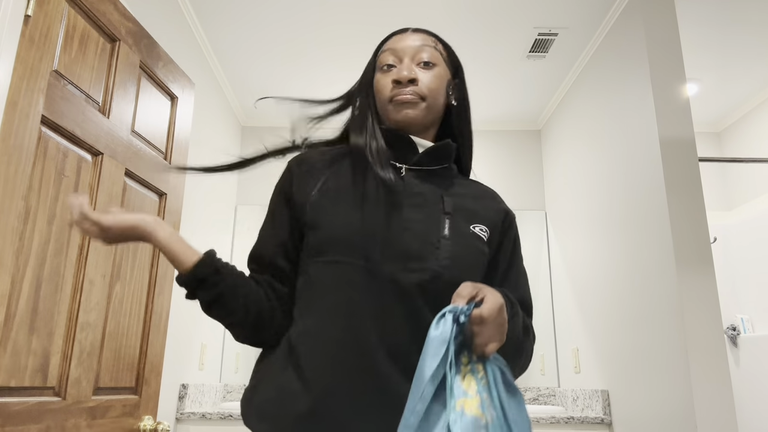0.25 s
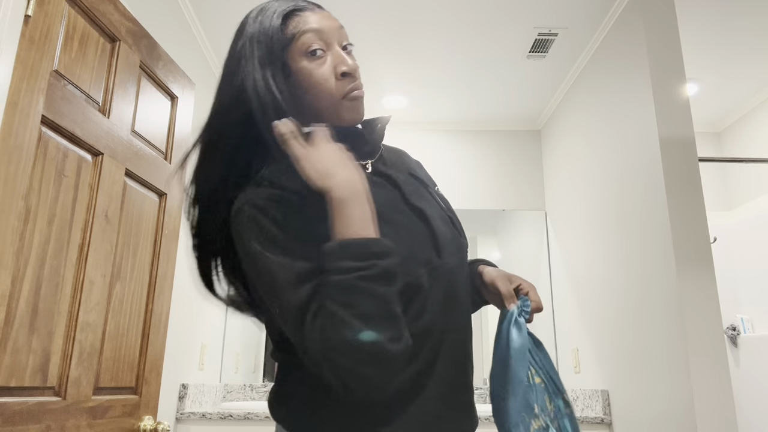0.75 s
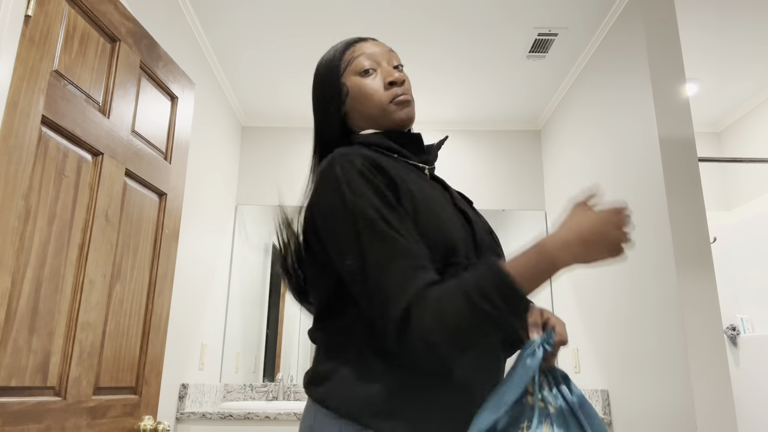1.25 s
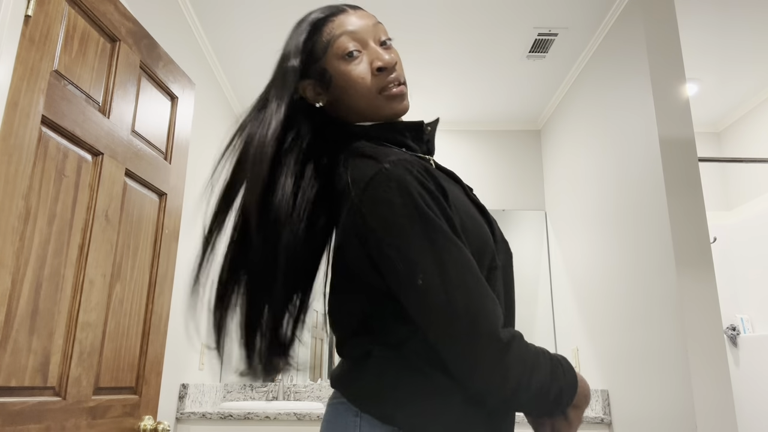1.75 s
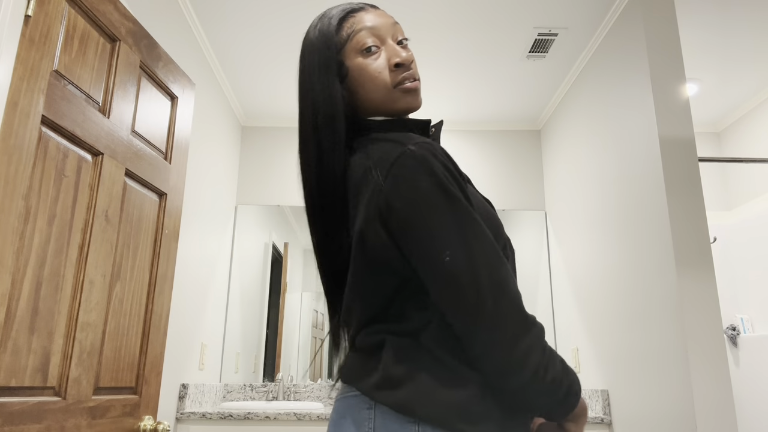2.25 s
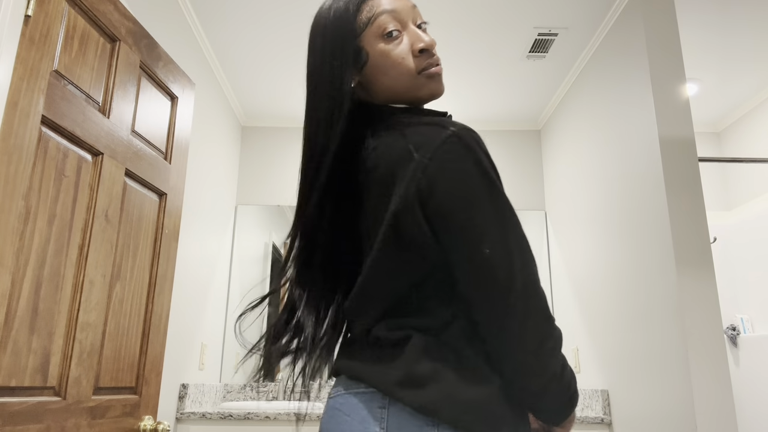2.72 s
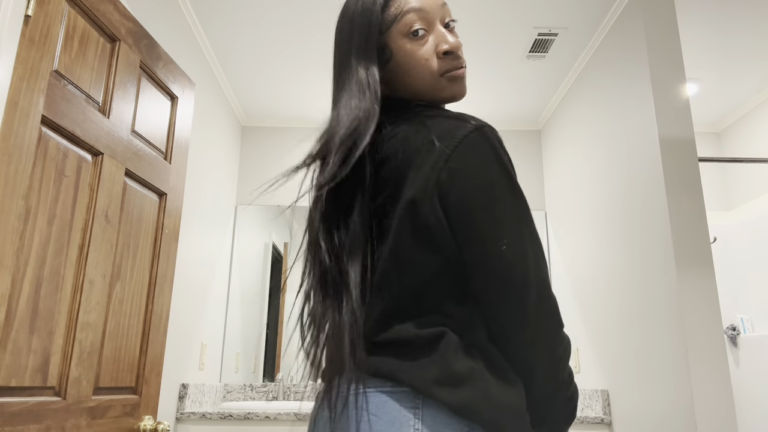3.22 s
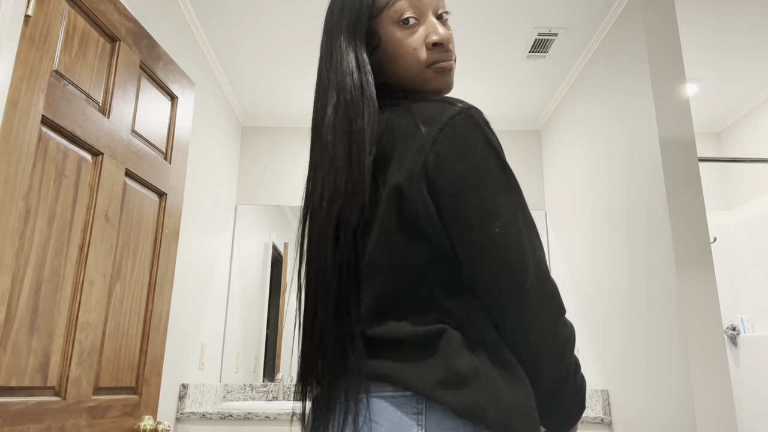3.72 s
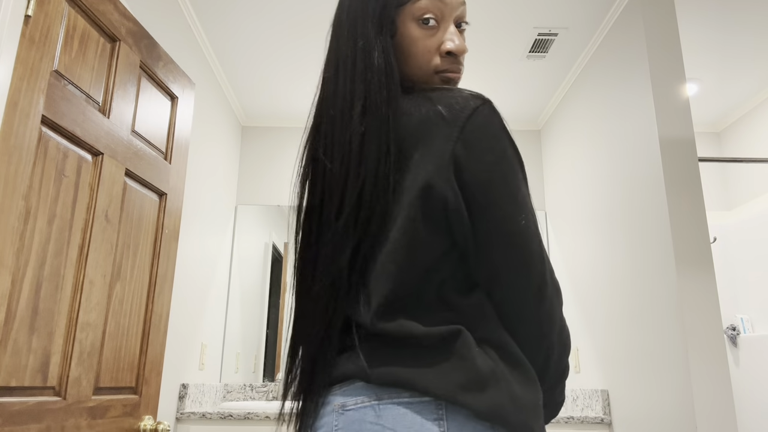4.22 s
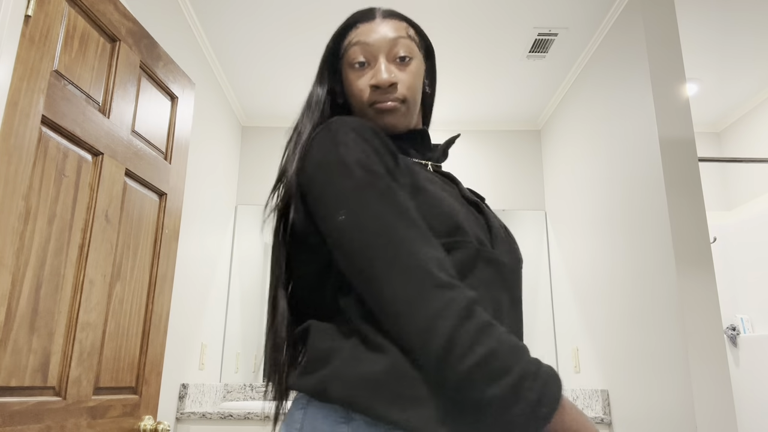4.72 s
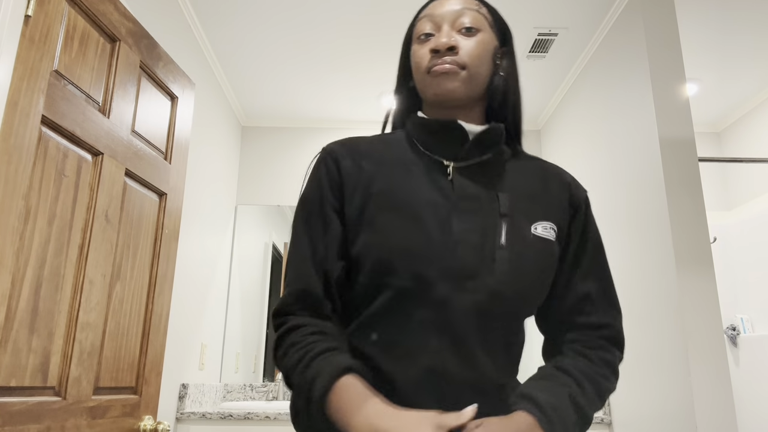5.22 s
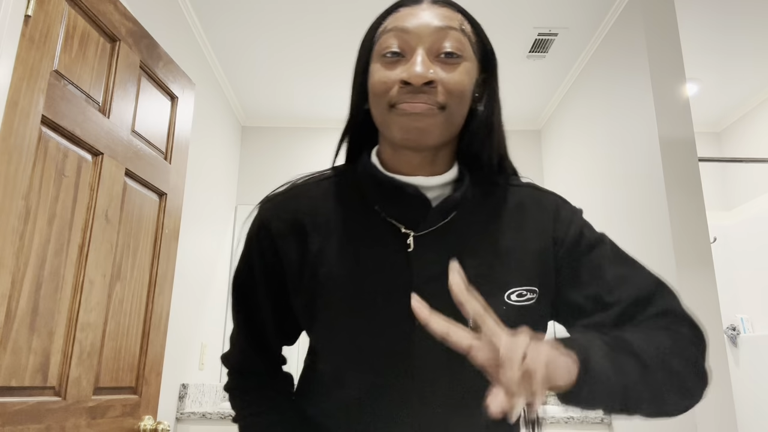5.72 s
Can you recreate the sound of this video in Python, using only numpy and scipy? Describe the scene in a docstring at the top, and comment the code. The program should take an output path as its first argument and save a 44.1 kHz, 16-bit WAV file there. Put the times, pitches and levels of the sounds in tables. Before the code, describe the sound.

A bathroom ventilation fan hums low and steadily while long hair and a fleece jacket swish faintly, with one sharper rustle near the end.

```python
"""A fan motor hums at twice the mains frequency, with weak wheel tones, under duct rumble and grille rush.
Over it, long hair and a fleece jacket swish now and then as someone turns about near the microphones.
The place is a small, hard-walled bathroom. Fan tones are fluttering cosines; air is shaped noise;
hair and sleeves are fibre slips plus hiss under movement swells; scrapes are grainy narrow noise bands;
jacket flaps are dull noise puffs. Hair, sleeves and scrapes also get a diffuse room answer."""
import sys
import numpy as np
from scipy import signal
from scipy.fft import rfft, irfft, next_fast_len
from scipy.io import wavfile
from scipy.ndimage import uniform_filter1d, map_coordinates

SR = 44100
rng = np.random.default_rng(int(sys.argv[2]) if len(sys.argv) > 2 else 0)


def dump(signal):
    """Clip the signal to [-1, 1] and save it as 16-bit WAV at the path in sys.argv[1]."""
    limited = np.clip(np.atleast_2d(signal).T, -1, 1)
    pcm = np.round(limited * 32767).astype(np.int16)
    wavfile.write(sys.argv[1], SR, pcm)


N = 262659

# lean_db is left minus right throughout; density_db is a relative noise spectrum per Hz
# motor and wheel tones: pitch_hz, level_db, left_right_phase_rad, flutter_share, lean_db
MOTOR_TONES = [(120, -26.2, 0, .049, -.3), (104, -51, 0, .3, 0), (240, -45, .31, .15, -4.5),
               (351, -57, .8, .9, 6), (360, -60, .8, .3, 3), (479.5, -64, .23, .3, 0),
               (600, -62, .16, .3, 0), (765, -62.5, 1.3, .9, -3), (1280, -73, .5, .9, 0)]
# very faint high whine: pitch_hz, level_db, left_right_phase_rad, flutter_share, lean_db
WHINE_TONES = [(6010, -91.5, 1.5, 1, 0), (6600, -93, 1.5, 1, 0), (9480, -93.5, 1.5, .3, 0),
               (9722, -93.5, 1.3, .3, 0)]
# slow course of the blade tone: time_s, level_db (before trim_db)
BLADE_COURSE = [(0, -53.5), (.6, -49.5), (1.3, -50), (2.101, -52), (3.1, -53), (3.6, -56.5), (4.401, -53),
                (4.9, -44.5), (5.3, -51), (5.95, -52.5)]
BLADE_HZ, BLADE_PHASE_RAD = 395.7, 1.34
# coming and going of a higher wheel tone: time_s, level_db (before trim_db)
OVERTONE_COURSE = [(0.0, -63), (0.08, -58), (2.5, -60), (2.55, -57), (3.15, -61), (3.17, -56), (5.95, -59)]
OVERTONE_HZ, OVERTONE_PHASE_RAD = 576, 1.7
# duct and room resonances: centre_hz, width_hz, relative_gain_db
DUCT_RESONANCES = [(61, 6.7, 1), (70, 14, 2), (113, 39, -3.5), (139.3, 10, 4.5), (165, 9, -10.5),
                   (229, 17, -4), (249.4, 12, -2), (265.4, 25, -7), (322.7, 23, -8.5), (354, 12, -6.5)]
# dip of the room where the microphones sit: centre_hz, width_hz, gain_db
ROOM_DIP = (202, 15, -5.5)
# air rushing through the grille: frequency_hz, density_db
GRILLE_SPECTRUM = [(250, -18), (420, 1), (520, -2), (600, 0.5), (780, -2), (900, -3.5), (970, -10.5),
                   (1300, -10.5), (1480, -15.5), (2100, -21.5), (2500, -25.5), (3000, -30), (4000, -32.5),
                   (5500, -38.5), (8000, -44), (8600, -44), (9900, -49.5), (11000, -70)]
# hiss of hair strands: frequency_hz, density_db
STRAND_SPECTRUM = [(1500, -9), (2100, -2), (3000, -6.5), (3600, -5), (4400, -4), (5300, -8.5), (6500, -7),
                   (8200, -8), (9700, -12.5), (10500, -27), (13000, -18), (14200, -40.5)]
# hair swinging over the fleece: peak_s, level_db, rise_s, fall_s
HAIR_SWINGS = [(0.06, -67, 0.093, 0.067), (0.395, -59, .025, 0.024), (0.445, -54, 0.079, 0.085),
               (0.69, -57.5, 0.038, 0.054), (0.775, -54.5, 0.051, 0.039), (0.868, -50, 0.069, 0.058),
               (1.402, -55.5, 0.025, 0.029), (1.595, -54.5, 0.03, 0.073), (1.69, -56, .03, 0.075),
               (1.85, -53, 0.02, 0.025), (1.91, -57.5, 0.028, 0.047), (2.09, -64.5, 0.022, 0.079),
               (2.24, -61, 0.051, 0.047), (3.05, -67, 0.056, 0.027), (3.18, -65, 0.042, 0.072),
               (3.485, -52.5, 0.063, 0.098), (3.565, -54.5, 0.062, 0.063), (4.06, -62, 0.052, 0.098),
               (4.43, -65, 0.067, 0.047), (4.62, -61.5, 0.042, .06), (4.78, -54, 0.15, 0.079),
               (5.344, -40.8, 0.017, 0.034), (5.285, -55, 0.045, 0.035), (5.4, -51.5, 0.053, 0.16),
               (5.562, -48, 0.017, 0.053), (5.9, -59, 0.088, 0.087)]
# soft creep of the hair while the body turns: peak_s, level_db, rise_s, fall_s
BODY_TURNS = [(1.0, -64, .3, 0.12), (1.65, -65.5, 0.61, 0.44), (4.95, -67.5, 0.24, 0.65),
              (5.65, -65.5, .3, 0.33)]
SWELL_EXPONENT = 1.34  # 1 = pointed, 2 = bell
# strands that catch and let go: rate, boost ceiling before levelling, decay time
SNAGS_PER_S, SNAG_DB, SNAG_S = 86, 2.5, 0.0033
# dull rub of the fleece: frequency_hz, density_db
FLEECE_SPECTRUM = [(200, -44.5), (500, 10.5), (900, 11), (1500, 2), (2100, 2.5), (3000, -3), (5000, -27),
                   (9500, -31), (12000, -61.5)]
# sleeves brushing the body: peak_s, level_db, length_s (Gaussian sigma), rasp_hz, rasp_db (re rub)
SLEEVE_BRUSHES = [(0.487, -53, 0.022, 3960, -15), (0.586, -54.5, 0.02, 3800, -11),
                  (0.75, -65.5, 0.016, 3700, 2), (0.877, -57.5, 0.017, 3430, -5),
                  (1.41, -49, 0.017, 3650, -8), (1.617, -54, 0.028, 7800, -3.5),
                  (1.852, -49, 0.025, 4200, -11.5), (3.178, -65, 0.04, 3900, -3),
                  (3.492, -57.5, 0.028, 3600, -1), (3.56, -57, 0.033, 3380, -4),
                  (4.768, -65, 0.058, 3820, -2), (5.356, -45.5, .027, 6000, -1),
                  (5.425, -53, 0.13, 6000, -17), (5.582, -45.5, 0.025, 6000, -18),
                  (5.881, -51, 0.055, 3980, -16)]
# fold or seam dragging over the fleece: peak_s, level_db, length_s (rise to peak), pitch_hz
SEAM_SCRAPES = [(0.485, -62, .012, 2400), (0.595, -63, .008, 2300), (0.754, -60, .006, 3650),
                (0.872, -57, .014, 2400), (0.922, -56, .004, 4000), (1.408, -60, .008, 2900),
                (1.61, -61, .012, 2050), (1.851, -58, .007, 4500), (3.18, -62, .035, 1900),
                (3.47, -61, .012, 4400), (3.575, -59, .03, 4700), (5.345, -51, .018, 2350),
                (5.35, -53, .014, 4400), (5.342, -50, .011, 6250), (5.42, -57, .035, 4700),
                (5.57, -60, .012, 1900)]
# rasp width, unevenness of the weave and its rate
SCRAPE_OCTAVES, SCRAPE_GRAIN_DB, SCRAPE_GRAINS_PER_S = .16, 2.5, 220
# loose jacket flapping now and then in dull puffs: peak_s, level_db, rise_s, fall_s
JACKET_FLAPS = [(1.44, -51, .06, .06), (2.1, -43.5, 0.059, 0.067), (5.56, -51, 0.017, 0.033)]
# dull puff from the folds: frequency_hz, density_db
FOLD_SPECTRUM = [(200, -27), (500, 2.5), (800, -3.5), (1300, -9), (2000, -21), (5000, -42.5), (11000, -81)]
# left-right likeness of the noises: frequency_hz, correlation (-1 to 1)
EAR_LIKENESS = [(60, 0.93), (110, 1), (170, 0.63), (250, 0.86), (350, 0.074), (520, -0.36), (900, 0.08),
                (1500, -0.47), (2280, 0.26), (2880, -0.31), (3600, 0.21), (4450, -0.18), (6100, .22),
                (7100, -0.36), (8500, 0.37), (9700, -.4)]
# left-right balance of the noises: frequency_hz, lean_db
EAR_LEAN = [(60, 2.5), (180, -2.5), (270, -3), (350, 0.5), (560, 0.5), (830, 0.5), (1050, -1), (1400, -2),
            (2000, -4), (2800, -2.5), (4200, 1), (5700, -6), (8000, -4), (9500, -0.5)]
# decay of the room: frequency_hz, t60_s
WALL_DECAY = [(200, 0.94), (2000, 0.64), (10000, 0.2)]
EARS = np.array([[.5], [-.5]])  # left, right share of a difference
TOP_HZ = 15700


def amp(db):
    """Decibels to gain."""
    return 10 ** (np.asarray(db) / 20)


def unit(x):
    """Scale to rms 1."""
    return x / np.sqrt(np.mean(x ** 2) + 1e-20)


def along(points, hz):
    """Read (frequency_hz, value) points on a log-frequency axis."""
    point_hz, value = np.transpose(points)
    return np.interp(np.log(hz + 1), np.log(point_hz + 1), value)


def clock():
    """Time of every sample, in seconds."""
    return np.arange(N) / SR


def wobble(knots_per_s):
    """Smooth random curve through Gaussian knots."""
    knots = rng.standard_normal(int(N * knots_per_s / SR) + 4)
    return map_coordinates(knots, [clock() * knots_per_s])


def filtered(x, response):
    """Apply a zero-phase response of frequency in Hz."""
    size = next_fast_len(N + SR // 2)
    hz = np.fft.rfftfreq(size, 1 / SR)
    return irfft(rfft(x, size) * response(hz), size)[..., :N]


def placed(pair, colour):
    """Colour two unrelated signals; mix to the tabled likeness and lean: bass alike, treble diffuse."""
    def mid_side_gain(hz):
        turn_rad = np.arccos(np.clip(along(EAR_LIKENESS, hz), -1, 1)) / 2
        return colour(hz) * [np.cos(turn_rad), np.sin(turn_rad)]

    mid, side = filtered(pair, mid_side_gain)
    ears = np.array([mid + side, mid - side])
    return unit(filtered(ears, lambda hz: amp(EARS * along(EAR_LEAN, hz))))


def mottled(x, patchy_db):
    """Lay patches of random gain, about 600 Hz by 50 ms, over x."""
    grid = signal.stft(x, nperseg=512)[2]
    field = rng.standard_normal(grid.shape[1:])
    field = uniform_filter1d(field, size=7, axis=0)
    field = uniform_filter1d(field, size=9, axis=1)
    return signal.istft(grid * amp(patchy_db * unit(field)), nperseg=512)[1][:, :N]


def room(x):
    """Diffuse answer of the walls: noise decaying by frequency, unrelated at each microphone."""
    hz, t, grid = signal.stft(rng.standard_normal((2, SR // 2)), SR, nperseg=256)
    decay = amp(-60 * t / along(WALL_DECAY, hz)[:, None])
    tail = signal.istft(grid * decay, SR, nperseg=256)[1]
    return signal.fftconvolve(x, tail / np.linalg.norm(tail[0]), axes=1)[:, :N]


def friction(spectrum, slips_per_s, spread_db, blur_db, patchy_db):
    """Tiny fibre slips of uneven size on a diffuse hiss; the colour shifts as the contact moves."""
    slips = (rng.random((2, N)) < slips_per_s / SR) * rng.standard_normal((2, N))
    slips = unit(slips * amp(spread_db * rng.standard_normal((2, N))))
    hiss = amp(blur_db) * rng.standard_normal((2, N))
    rub = mottled(slips + hiss, patchy_db)
    return placed(rub, lambda hz: amp(along(spectrum, hz)))


def swells(rows):
    """Summed power of movements that speed up to a peak and slow down again, as a gain."""
    t, power = clock(), np.zeros(N)
    for peak_s, level_db, rise_s, fall_s in rows:
        away = np.abs(t - peak_s) / np.where(t < peak_s, rise_s, fall_s)
        power += (amp(level_db) * np.exp(-away ** SWELL_EXPONENT)) ** 2
    return np.sqrt(power)


def snags():
    """Rms-1 gain of the sliding: brief random spurts where strands catch and let go."""
    catches = rng.random(N) < SNAGS_PER_S / SR
    release = np.exp(-np.arange(SR // 20) / SR / SNAG_S)
    spurts = signal.fftconvolve(catches, release)[:N]
    return unit(amp(SNAG_DB * np.tanh(spurts)))


def weave_rasp(pitch_hz, octaves, count):
    """Rasp of the weave: noise in a band that is Gaussian in octaves."""
    hz = np.fft.rfftfreq(SR, 1 / SR)
    band = np.exp(-.5 * (np.log2((hz + 1) / pitch_hz) / octaves) ** 2)
    return unit(irfft(rfft(rng.standard_normal((2, SR))) * band, SR))[:, :count]


def motor():
    """Magnetic hum, wheel tones and whine; turbulence makes the weaker ones flutter in size and phase."""
    t, out = clock(), np.zeros((2, N))
    for pitch_hz, level_db, phase_rad, flutter, lean_db in MOTOR_TONES + WHINE_TONES:
        size = amp(level_db) * unit(1 + flutter * wobble(8))
        angle_rad = 2 * np.pi * (pitch_hz * t + rng.random()) + flutter * (wobble(3) + wobble(10))
        out += np.sqrt(2) * size * amp(lean_db * EARS) * np.cos(angle_rad + phase_rad * EARS)
    return out


def blades(course, pitch_hz, phase_rad, trim_db, lean_db, flutter_db):
    """A thin tone of the wheel's blades, fluttering in the uneven inflow."""
    course_db = np.interp(clock(), *np.transpose(course))
    level = amp(course_db + trim_db + flutter_db * wobble(14) + lean_db * EARS)
    angle_rad = 2 * np.pi * (pitch_hz * clock() + rng.random()) + 0.17 * wobble(8.7)
    return np.sqrt(2) * level * np.cos(angle_rad + phase_rad * EARS)


def duct(hz, corner_hz=430):
    """Gain of the low resonances, with the room dip; the duct swallows what lies above them."""
    power = 0
    for centre_hz, width_hz, gain_db in DUCT_RESONANCES:
        damping = (hz * width_hz) ** 2
        power = power + amp(gain_db) ** 2 * damping / ((centre_hz ** 2 - hz ** 2) ** 2 + damping)
    dip_hz, dip_width_hz, dip_db = ROOM_DIP
    dip = amp(dip_db * np.exp(-((hz - dip_hz) / dip_width_hz) ** 2))
    return np.sqrt(power / (1 + (hz / corner_hz) ** 8)) * dip


def air():
    """Steady flow: lumpy rumble in the duct's resonances and a softer, eddying rush at the grille."""
    rumble = amp(-34.5 + .8 * wobble(9)) * placed(rng.standard_normal((2, N)), duct)
    eddies = mottled(rng.standard_normal((2, N)), patchy_db=1.35)
    rush = placed(eddies, lambda hz: amp(along(GRILLE_SPECTRUM, hz)))
    return rumble + amp(-43.0 + 0.36 * wobble(8.4)) * rush


def hair():
    """Strands hiss as they slide over the jacket, catching and letting go."""
    stroke = np.hypot(swells(HAIR_SWINGS), swells(BODY_TURNS)) * snags()
    hiss = stroke * friction(STRAND_SPECTRUM, slips_per_s=6000, spread_db=3.5, blur_db=0.5, patchy_db=1.7)
    return hiss + amp(-5.0) * room(hiss)


def sleeves(rasp_octaves=0.19):
    """Each arm swing is a swell of dull cloth friction, with a band of rasp from the weave on top."""
    rub = friction(FLEECE_SPECTRUM, slips_per_s=3000, spread_db=4.0, blur_db=-0.5, patchy_db=3.0)
    t, cloth = clock(), np.zeros((2, N))
    for peak_s, level_db, length_s, rasp_hz, rasp_db in SLEEVE_BRUSHES:
        near = np.abs(t - peak_s) < .25
        rasp = weave_rasp(rasp_hz, rasp_octaves, near.sum())
        rasp = rasp * amp(along(EAR_LEAN, rasp_hz) * EARS)
        swing = amp(level_db) * np.exp(-.5 * ((t[near] - peak_s) / length_s) ** 2)
        cloth[:, near] += swing * (rub[:, near] + amp(rasp_db) * rasp)
    cloth = cloth * snags()
    return cloth + amp(-8.5) * room(cloth)


def scrapes(fall_per_rise=1.6):
    """A fold grips quickly, rasps over the weave in a narrow, grainy band and lets go."""
    t, cloth = clock(), np.zeros((2, N))
    for peak_s, level_db, length_s, pitch_hz in SEAM_SCRAPES:
        near = np.abs(t - peak_s) < .25
        rasp = weave_rasp(pitch_hz, SCRAPE_OCTAVES, near.sum())
        away = (t[near] - peak_s) / np.where(t[near] < peak_s, length_s, fall_per_rise * length_s)
        cloth[:, near] += amp(level_db) * np.exp(-away ** 2) * rasp
    cloth = cloth * unit(amp(SCRAPE_GRAIN_DB * wobble(SCRAPE_GRAINS_PER_S)))
    return cloth + amp(-5) * room(cloth)


def jacket():
    """Folds of the jacket push a dull puff of air."""
    puff = placed(rng.standard_normal((2, N)), lambda hz: amp(along(FOLD_SPECTRUM, hz)))
    return swells(JACKET_FLAPS) * puff


def scene():
    """The fan, with the rustles in front of it."""
    wheel = blades(BLADE_COURSE, BLADE_HZ, BLADE_PHASE_RAD, trim_db=0.3, lean_db=-6, flutter_db=2.2)
    wheel += blades(OVERTONE_COURSE, OVERTONE_HZ, OVERTONE_PHASE_RAD, trim_db=-0.5, lean_db=8, flutter_db=2.2)
    fan = motor() + wheel + air()
    return fan + hair() + sleeves() + scrapes() + jacket()


def record(dry):
    """Fade both ends over 3 ms against clicks, then low-pass steeply at the band limit."""
    ends = np.clip(np.minimum(clock(), clock()[::-1]) / .003, 0, 1)
    return filtered(dry * ends, lambda hz: 1 / np.sqrt(1 + (hz / TOP_HZ) ** 80))


dry = scene()
out = record(dry)
dump(out)
```